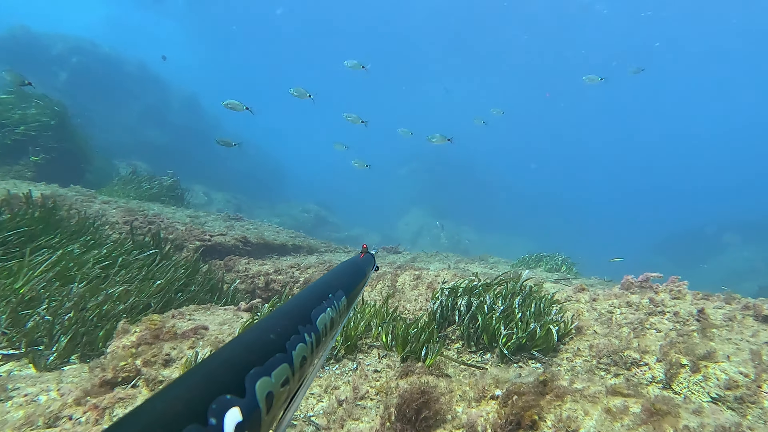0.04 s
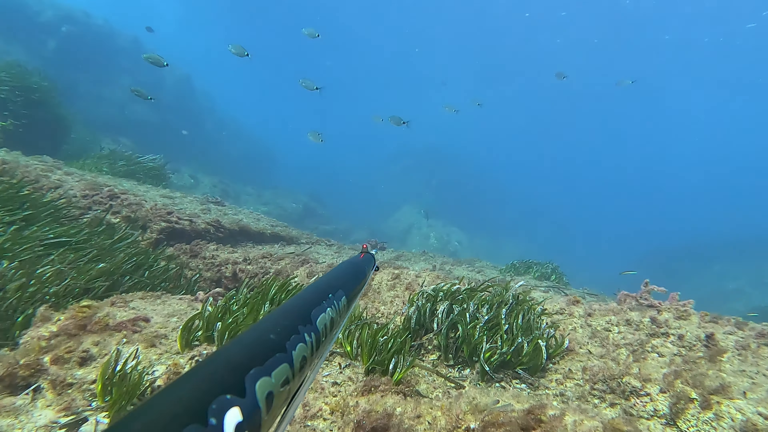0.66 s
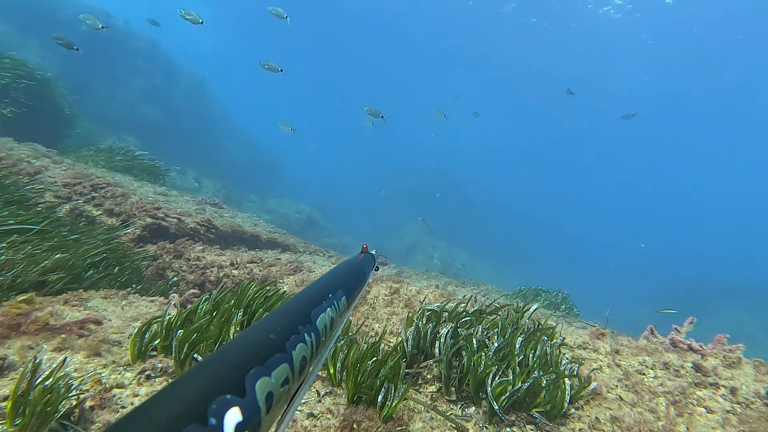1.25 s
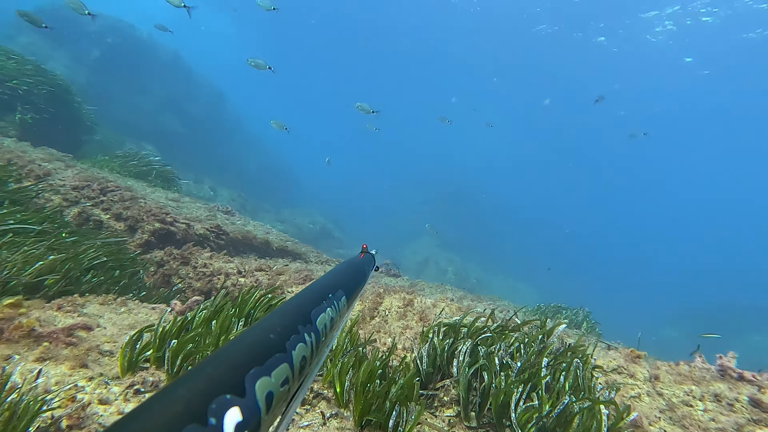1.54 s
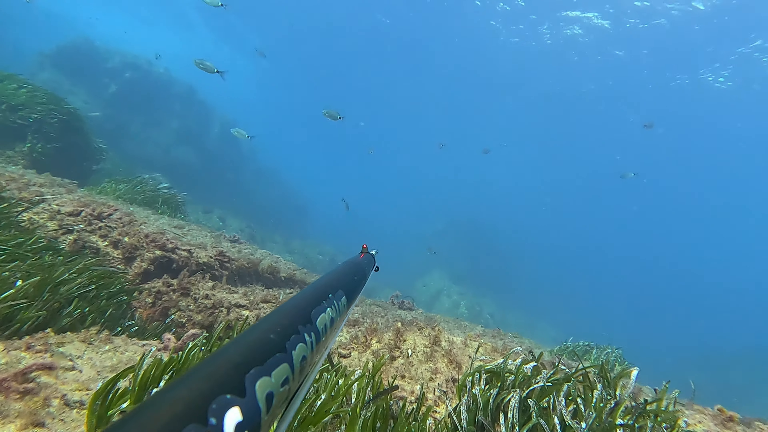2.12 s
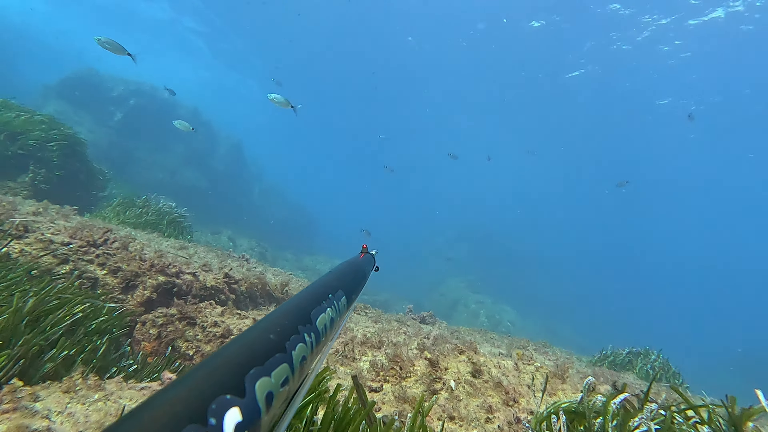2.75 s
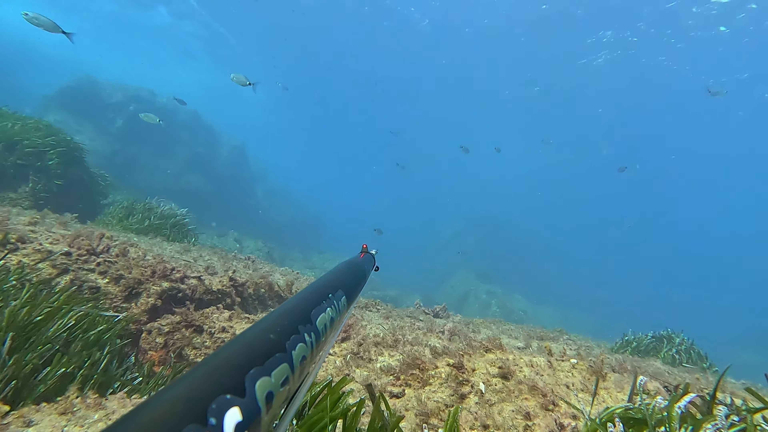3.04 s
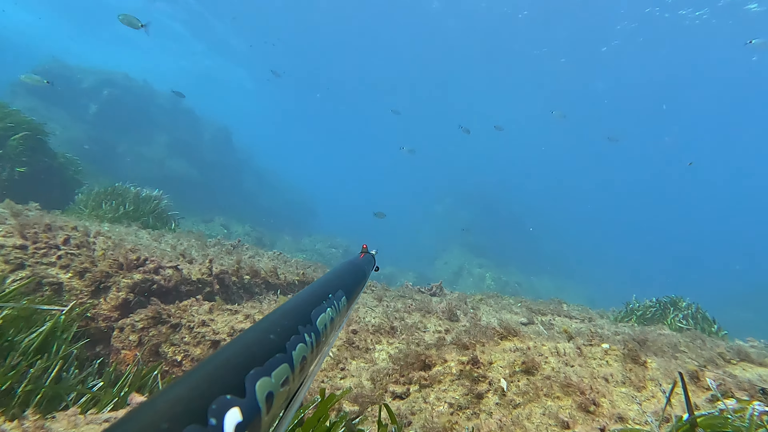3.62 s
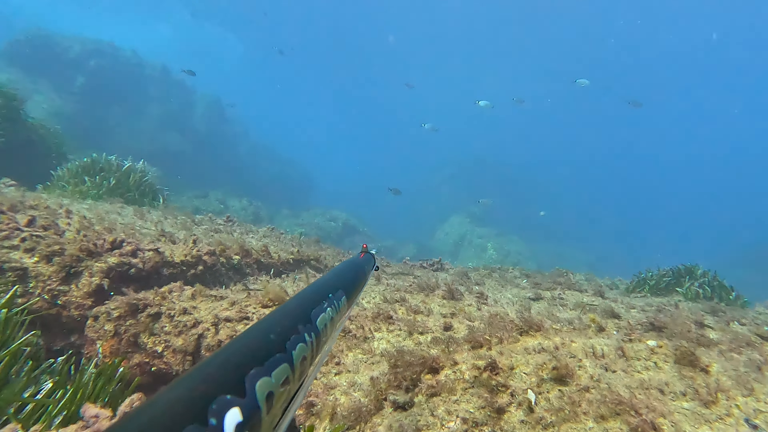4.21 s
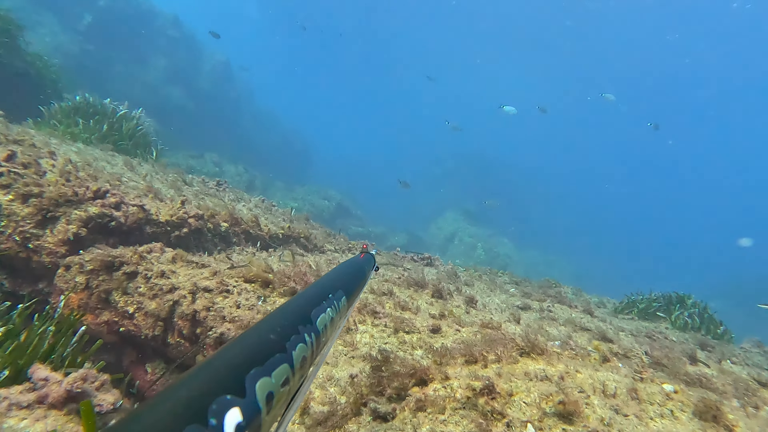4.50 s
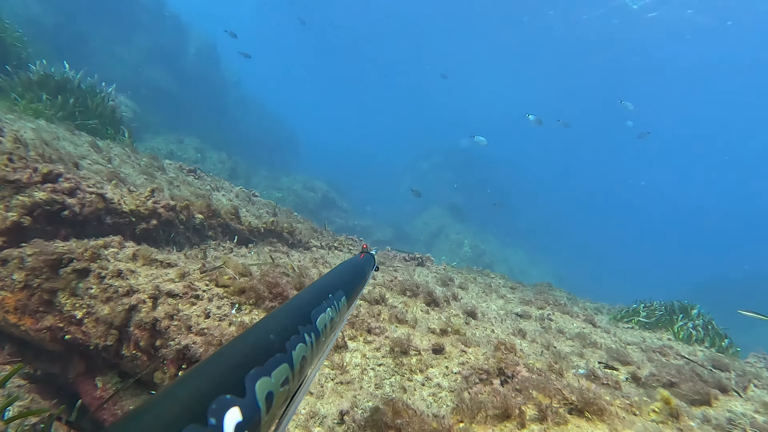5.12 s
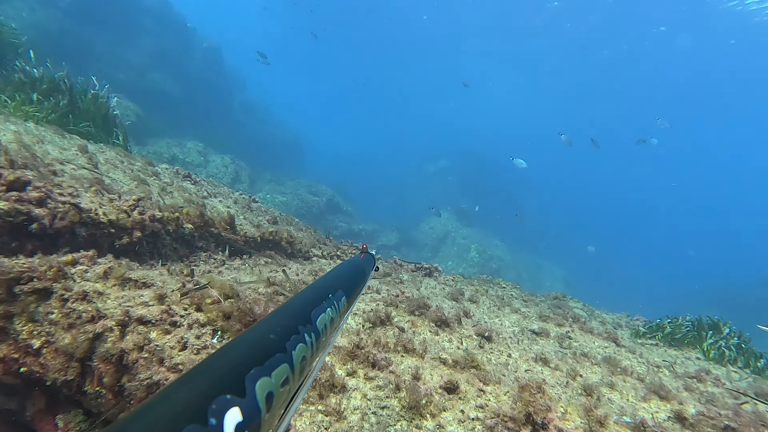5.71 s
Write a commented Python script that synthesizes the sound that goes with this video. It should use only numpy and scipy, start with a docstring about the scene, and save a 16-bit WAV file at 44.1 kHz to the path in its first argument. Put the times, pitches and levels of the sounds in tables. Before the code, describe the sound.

A camera in a waterproof housing glides through the sea on a speargun, picking up the constant, irregular crackle of shrimp over a deep water rumble. Faint taps and a soft slide of gear come here and there. The water surges and gurgles around the middle, then surges again as the sharpest click sounds. One dull knock follows, with a tap and, near the end, a brief scrape.

```python
"""Speargun camera over a reef

A housed camera on a speargun glides over a rocky seabed. Snapping shrimp crackle near and far:
claw bubbles collapse, scatter off the rocks and ring the housing wall. Moving water rocks the
housing with a low rumble, a few surges and gurgles. The gear slides softly twice, gives one
dull knock, then a tap, and later a short rub; lighter taps fall here and there."""
import sys
import numpy as np
from scipy import signal
from scipy.fft import rfft, irfft, next_fast_len
from scipy.io import wavfile
from scipy.ndimage import uniform_filter1d

SR = 44100
rng = np.random.default_rng(int(sys.argv[2]) if len(sys.argv) > 2 else 0)


def log_audio(samples):
    """Write samples as a 16-bit WAV file to the path given in sys.argv[1]."""
    # one column per channel
    frames = np.atleast_2d(samples).T
    # limit to full scale, then quantise
    limited = np.clip(frames, -1, 1)
    pcm = np.round(limited * 32767).astype(np.int16)
    wavfile.write(sys.argv[1], SR, pcm)


N = 262395
TIME = np.arange(N) / SR

# Surges as the gun swings. Each row: crest in seconds, sway in dB, rumble in dB, rocking in Hz.
SURGES = [(1.77, -42.5, -48, 17), (2.359, -33, -49.5, 17), (2.844, -22.5, -43, 19.3),
          (4.192, -20.5, -46, 17.2), (4.588, -27.5, -41, 18.5)]


def near_shrimp(rise_s=0.001):
    """Each collapsing claw bubble arrives by many paths and briefly rings the housing wall."""
    # Each row: time in seconds, level in dB, body and top bands in dB re level, optional own ring in Hz.
    snaps = [(0.039, -56.5, -12, -14), (0.052, -49.5, -13, -30, 4590), (0.118, -65.5, 3, -4),
             (0.1315, -53, -5, -13), (0.1676, -61.5, 2, -10), (0.179, -57.5, -6, -15),
             (0.228, -62, -8, -17), (0.245, -65, -8, -10), (0.2943, -59.5, -2.5, -29),
             (0.385, -63, -6, -20), (0.442, -65, 0, -5), (0.468, -66, -8, -8), (0.593, -69, -3, -5),
             (0.6625, -68, -2, -20), (0.702, -57, -1, -14), (0.7546, -53, -4, -17, 5180),
             (0.7588, -54.5, 2, -25, 1450), (0.8557, -64, -8, -6), (0.864, -59, -4, -9),
             (0.9986, -63, -17, -11), (1.038, -56, -2.5, -16), (1.0936, -47.5, -4, -16.5, 3930),
             (1.109, -60, -2, -18), (1.1554, -57.5, 1, -12), (1.2664, -49.5, -9, -9, 5510),
             (1.348, -64.5, -8, -3), (1.3754, -62.5, -16, -12), (1.455, -63, -3, -19),
             (1.5682, -68, -1, -3), (1.6182, -61, -4, -6), (1.629, -59.5, -8, -17), (1.669, -58, -8, -18),
             (1.677, -55.5, -4, -23), (1.7729, -62.5, 7.5, -31), (1.822, -65.5, -1, -7),
             (1.894, -66, -7, -5), (1.967, -60.5, -3.5, -6), (2.091, -64.5, -10, -4), (2.207, -65, 4, 4.5),
             (2.289, -63, -8, -23), (2.339, -67, -8, -12), (2.387, -58, -6, -30),
             (2.582, -53, -8, -12, 5440), (2.691, -69, -7, -1), (2.7233, -50, -9, -18, 5420),
             (2.754, -64.5, -5, 0), (2.81, -66, -11, -8), (2.8362, -65, 6, -19),
             (2.868, -54.5, 4.5, -18, 2760), (3.005, -60, -4, -13), (3.029, -72, -15, -23),
             (3.0784, -54.5, -2, -12), (3.1155, -51.5, -13, -15, 5370), (3.1683, -58, -14, -11),
             (3.187, -64.5, -10, -8), (3.209, -66, -10, -12), (3.2445, -53.5, -2.5, -14, 4540),
             (3.283, -62.5, -6, -8), (3.317, -64, -3, -18), (3.38, -60, -11, -12),
             (3.459, -44, -5, -14.5, 5450), (3.573, -66, -8, -12), (3.6614, -43, -14.5, -21.5, 3980),
             (3.7195, -66, -2, -22), (3.7471, -55, 1, -16), (3.7818, -60.5, 3, -7), (3.8547, -61.5, 0, -10),
             (3.916, -66, -8, -12), (3.9574, -61.5, -9, -6), (3.969, -64, -3, -4), (4.018, -65, -8, -12),
             (4.048, -57.5, 0, -24), (4.1125, -68, 0, -16), (4.2163, -35.5, -7, -18.5, 5500),
             (4.3182, -63, -19, -10), (4.329, -60.5, 2.5, -10), (4.357, -58, -1, -30),
             (4.4297, -56, -4.5, -15), (4.617, -65, -6, 0), (4.627, -54, -10, -11), (4.6703, -69, 5.5, -26),
             (4.722, -56.5, 5, -13), (4.925, -66, -8, -12), (5.0736, -58.5, -3, -24), (5.091, -64, -5, -26),
             (5.237, -59.5, -19, -19), (5.2623, -55, -11, -21), (5.3756, -69, -13, -9),
             (5.4265, -66, -9, -10), (5.482, -66, -8, -10), (5.494, -51.5, -2.5, -22, 4370),
             (5.509, -57, -0.5, -19), (5.55, -72, -3, 1), (5.6277, -64, -6, -8), (5.702, -56.5, -2, -22),
             (5.8324, -51, 2.5, -17, 4290), (5.887, -66, 0, -3), (5.8956, -73, 7, -21)]
    # A snap through the wall. Each row: frequency in Hz, relative density in dB.
    snap_colour = [(600, -22), (1100, -16), (1450, -3.5), (2000, -1.5), (2450, -7), (3050, 1), (3500, -5.5),
                   (4000, 2.5), (4800, 2.5), (5450, 6.5), (6000, 2), (9000, -16), (10500, -23.5),
                   (15000, -32)]
    paths = rms_one(coloured(clicks(per_s=4500, spread_db=-2.0, limit=8.1), snap_colour))
    clumps = rms_one(from_db(wander(0.002)))   # scatter returns rock by rock, 1 dB rms
    bands = [([600, 3300], [body_db for _, _, body_db, *_ in snaps]),
             ([3300, 7200], [-1.0] * len(snaps)),
             ([7800, 15500], [top_db for _, _, _, top_db, *_ in snaps])]
    out = 0
    for edges_hz, offsets_db in bands:
        band = signal.sosfilt(signal.butter(4, edges_hz, "band", fs=SR, output="sos"), paths)
        power = sum(from_db(offset_db) ** 2 * snap_power(start_s, db, rise_s, clumps)
                    for (start_s, db, *_), offset_db in zip(snaps, offsets_db))
        out = out + np.sqrt(power) * steadied(band, 0.0031)
    return out + wall_rings(snaps, rise_s)


def snap_power(start_s, level_db, rise_s, clumps, hold_s=0.00048, fall_s=0.001, scatter_s=0.0102):
    """Power envelope of a snap: a tight cluster of direct paths, then scatter from the rocks."""
    power = np.zeros(N)
    span = slice(max(int((start_s - .01) * SR), 0), int((start_s + .2) * SR))
    age_s = TIME[span] - start_s
    late_s = np.maximum(age_s - hold_s, 0)
    onset = np.exp(np.minimum(age_s, 0) / rise_s)
    scatter_db = -10 - 0.2343 * (level_db + 45.5)   # weaker snaps are farther off: more scatter
    scatter = (from_db(scatter_db) * clumps[span]) ** 2 * np.exp(-late_s / scatter_s)
    power[span] = from_db(level_db) ** 2 * onset * (np.exp(-late_s / fall_s) + scatter)
    return power


def wall_rings(snaps, rise_s, ring_s=0.0011, spread_db=3.0, detune=0.025, own_db=-5, own_s=0.0013):
    """Each snap strikes the wall from another side, so its modes vary in level and pitch."""
    # Each row: frequency in Hz, level in dB re the snap, share of the snap's body dB that it follows.
    wall_modes = [(2990, -11.5, 0.4), (4210, -11.5, 1), (5446, -8, 0)]
    out = np.zeros(N)
    draws = rng.uniform(-1, 1, (len(snaps), len(wall_modes), 2))
    for (start_s, db, body_db, _, *own_hz), chances in zip(snaps, draws):
        span = slice(int((start_s - .01) * SR), int((start_s + .05) * SR))
        age_s = TIME[span] - start_s
        modes = [(hz * (1 + detune * higher), mode_db + follows * body_db + spread_db * louder, ring_s)
                 for (hz, mode_db, follows), (louder, higher) in zip(wall_modes, chances)]
        for hz in own_hz:   # a hard snap drives one mode above the rest
            nearest = np.argmin([abs(mode[0] - hz) for mode in modes])
            modes[nearest] = (hz, own_db, own_s)
        for hz, mode_db, decay_s in modes:
            power = np.exp(np.minimum(age_s, 0) / rise_s - np.maximum(age_s, 0) / decay_s)
            out[span] += from_db(db + mode_db) * np.sqrt(2 * power) * np.sin(2 * np.pi * hz * age_s)
    return out


def surge(crest_s, rise_db_per_s=397, fall_db_per_s=82):
    """Envelope of a surge: builds fast, ebbs slowly."""
    rise_db = np.clip(rise_db_per_s * (crest_s - TIME), -200, 200)
    fall_db = np.clip(fall_db_per_s * (TIME - crest_s), -200, 200)
    return 1 / (from_db(rise_db) + from_db(fall_db))


def rocking():
    """Each surge rocks the gun for a few smooth, very low cycles."""
    return sum(np.sqrt(2) * from_db(db) * surge(crest_s) * np.cos(2 * np.pi * hz * (TIME - crest_s))
               for crest_s, db, _, hz in SURGES)


def water():
    """Flow round the housing: slow pressure sway, and a rumble that swells in each surge."""
    # Each row: time in seconds, sway in dB, rumble between surges in dB.
    flow = [(0.1, -38.5, -54), (0.55, -40.5, -58), (1.15, -41, -55.5), (1.75, -43, -54.5), (2.6, -43, -55),
            (3.07, -45, -57), (3.35, -50, -55.5), (3.6, -37, -51.5), (4.3, -38, -50.5), (4.72, -41.5, -58),
            (5.1, -41.5, -59), (5.35, -43, -59), (5.9, -36.5, -53)]
    # Sway and rumble spectra. Each row: frequency in Hz, relative density in dB.
    sway_colour = [(10, -3), (16, -1), (21, -5.5), (26, -17), (36, -24), (60, -74)]
    rumble_colour = [(26, -2.5), (34, 3.5), (45, 7.5), (58, -11.5), (85, -12.5), (130, -26.5), (200, -50.5)]
    sway_db, drift_db = in_time(flow)
    surge_power = sum(2 * (from_db(db) * surge(crest_s)) ** 2 for crest_s, _, db, _ in SURGES)
    sway = from_db(sway_db) * steadied(noise(sway_colour), 0.19)
    rumble = np.sqrt(from_db(drift_db) ** 2 + surge_power) * steadied(noise(rumble_colour), 0.09)
    return sway + rumble


def knock():
    """A padded blow rings the gun's body; water damps the high modes at once."""
    # Each row: time in seconds, impulse in dB, contact time in seconds.
    blows = [(4.566, 0.5, 0.00094)]
    # Each row: frequency in Hz, gain in dB, t60 in seconds, sign of the first swing.
    body_modes = [(21.7, -42, 0.7, 1), (91, -34, 0.5, -1), (216, -20, 0.026, 1), (267, -17, 0.029, -1),
                  (355, -26, 0.032, -1), (402, -34.5, 0.08, 1), (555, -21.5, 0.0275, 1),
                  (700, -28, 0.014, -1), (1010, -39, 0.05, -1)]
    force = 0
    for time_s, db, contact_s in blows:
        pulse = np.exp(-np.minimum((2 * (TIME - time_s) / contact_s) ** 2, 40))
        area = contact_s * SR * np.sqrt(np.pi) / 2
        force = force + from_db(db) * pulse / area
    return sum(sign * from_db(db) * ring(force, hz, t60_s) for hz, db, t60_s, sign in body_modes)


def taps(chatter_db=-6, chatter_s=0.02, low_below_hz=1150):
    """Light taps ping the housing near 1.4 kHz, a few also thud lower; a faint chatter follows each."""
    # Each row: start in seconds, level in dB, extra dB for the modes under low_below_hz.
    contacts = [(0.116, -65.5, -2), (0.127, -68, -2), (0.637, -62, -26), (0.681, -63, -28),
                (3.126, -59.5, -8), (4.72, -57.5, 12), (4.733, -59, -20), (4.796, -60.5, -18),
                (5.574, -65.5, 11)]
    # Each row: frequency in Hz, gain in dB, t60 in seconds.
    housing_modes = [(303, -2.5, 0.023), (440, 2, 0.017), (580, 2, 0.028), (731, -3.5, 0.06),
                     (1040, 7.5, 0.015), (1300, 1.5, 0.042), (1435, 9, 0.034), (1760, 0.5, 0.081),
                     (1620, 5, 0.02)]
    age_s, out = TIME[:SR // 10], 0
    chatter = from_db(chatter_db) * np.exp(-age_s / chatter_s) / np.sqrt(chatter_s * SR / 2)
    for k, (hz, mode_db, t60_s) in enumerate(housing_modes):
        force = np.zeros(N)
        for start_s, db, low_db in contacts:
            contact = chatter * rng.standard_normal(len(age_s))
            contact[0] += 1
            first = int(start_s * SR)
            force[first:first + len(age_s)] += from_db(db + low_db * (hz < low_below_hz)) * contact
        out = out + (-1) ** k * from_db(mode_db) * ring(force, hz, t60_s)
    return out


def rubs(gain_db=0.5, stutter_db=1.5, attack_s=0.0022, release_s=0.013, ring_db=-15):
    """Gear slides on gear in tiny slips that catch unevenly and ring the housing."""
    # Each row: start and length in seconds, level in dB, easing in dB per second, hiss in dB re level.
    strokes = [(2.75, 0.075, -68, 16, -4), (4.023, 0.15, -65, -6, 0), (5.569, 0.18, -50.5, 58, -13)]
    # Scrape and hiss through the housing. Each row: frequency in Hz, relative density in dB.
    scrape_colour = [(100, -9), (200, 11), (250, 0), (315, 11), (430, 3), (690, 5.5), (800, -2), (940, 1),
                     (1150, 2.5), (1650, -1.5), (2000, -7), (2500, -27), (5000, -32)]
    hiss_colour = [(900, -9), (1300, -1), (1700, 1), (2000, -4), (2400, -17)]
    pressure = hiss_gain = 0
    for start_s, length_s, db, easing_db_per_s, hiss_db in strokes:
        age_s = TIME - start_s
        contact = np.exp(np.minimum(age_s, 0) / attack_s - np.maximum(age_s - length_s, 0) / release_s)
        stroke = contact * from_db(db - easing_db_per_s * np.clip(age_s, 0, length_s))
        pressure = pressure + stroke
        hiss_gain = hiss_gain + from_db(hiss_db) * stroke
    catching = from_db(gain_db + stutter_db * wander(0.016))
    slips = clicks(per_s=820, spread_db=2.0, limit=2.1)
    ringing = from_db(ring_db) * rms_one(ring(slips, hz=717, t60_s=0.04))
    scrape = rms_one(rms_one(coloured(slips, scrape_colour)) + ringing)
    hiss = rms_one(coloured(slips, hiss_colour))
    return catching * (pressure * scrape + hiss_gain * hiss)


def gurgles(stir_db=-10.5):
    """Short low sliding tones: gurgles, plus the knock's burbling tail and the tap's low thud."""
    # Each row: peak in seconds, level in dB, pitch in Hz, swell or fade in seconds, slide as share per s.
    tones = [(0.123, -56, 127, .016, 0), (0.128, -70, 385, .017, 0), (0.259, -68, 280, .017, -4),
             (1.04, -69, 190, .02, 0), (1.45, -68.5, 430, .016, 1), (1.775, -65, 150, .02, 4),
             (2.055, -65, 211, .017, -5), (2.239, -57.5, 100, .017, 3), (2.79, -58, 188, .019, 5),
             (2.849, -49, 138, .017, -3), (3.2, -58.5, 280, .008, -6), (3.21, -45.5, 122, .013, -3),
             (3.224, -58, 200, .016, 3), (3.476, -60, 315, .012, -9), (3.478, -48.5, 112, .012, -6),
             (3.51, -64, 215, .022, 4), (3.573, -56, 115, .016, -3), (3.59, -66, 220, .02, -3),
             (3.616, -72, 550, .013, -8), (3.826, -64, 217, .017, 4), (4.103, -61, 205, .03, 0),
             (4.582, -44, 155, .011, -4), (4.6, -51, 210, .017, 3), (4.612, -50, 115, .016, -3),
             (4.665, -64, 320, .012, -5), (4.668, -62, 220, .016, 0), (4.685, -56, 112, .016, -3),
             (4.72, -52, 135, .014, 0), (4.799, -59, 290, .007, -4), (5.65, -56, 312, .015, -3),
             (5.71, -60, 120, .025, 0)]
    # Stirred water under each tone. Each row: frequency in Hz, relative density in dB.
    stir_colour = [(80, -3), (140, 7), (300, -5.5), (380, -9), (500, -21)]
    stir = from_db(stir_db) * steadied(noise(stir_colour), 0.0246)
    out = np.zeros(N)
    for peak_s, db, hz, swell_s, slide_per_s in tones:
        age_s = TIME - peak_s
        phase = 2 * np.pi * hz * age_s * (1 + .5 * slide_per_s * age_s) + rng.uniform(0, 2 * np.pi)
        swell = np.exp(-np.minimum((age_s / swell_s) ** 2, 20))
        out += from_db(db) * swell * (np.sqrt(2) * np.sin(phase) + stir)
    return out


def far_shrimp(mean_db=-68, swing_share=0.99):
    """Thousands of snaps a second, dulled by distance into a wash."""
    # Crackle activity. Each row: time in seconds, relative level in dB.
    activity = [(0.0, -68.5), (0.33, -70.5), (1.08, -67), (1.44, -69), (4.17, -68.5), (5.22, -71),
                (5.95, -67.5)]
    # Each row: frequency in Hz, relative density in dB.
    far_colour = [(350, -11), (800, -14.5), (1130, -9.5), (1380, 1), (1600, 2), (1900, -3.5), (2450, -12.5),
                  (3050, -12), (3500, -16), (4800, -17.5), (5450, -13), (6100, -17), (7400, -18),
                  (9200, -31), (10800, -47), (12200, -42), (15000, -50)]
    activity_db, = in_time(activity)
    level_db = mean_db + swing_share * (activity_db - activity_db.mean())
    snaps = clicks(per_s=4000, spread_db=0.5, limit=3.9)
    return from_db(level_db) * rms_one(coloured(snaps, far_colour))


def eddies(patchy_db=3.3):
    """The housing's edges shed small eddies in patches."""
    # Each row: time in seconds, level in dB.
    shedding = [(0.1, -68.5), (0.5, -74.5), (1.25, -71.5), (1.9, -70.5), (2.5, -70.5), (2.8, -68.5),
                (3.1, -73.5), (3.7, -70.5), (4.3, -71.5), (5.1, -72), (5.9, -74)]
    # Each row: frequency in Hz, relative density in dB.
    eddy_colour = [(50, -5), (90, -4.5), (140, 3.5), (200, -0.5), (300, -3.5), (400, -13.5), (520, -8.5),
                   (750, -17.5)]
    level_db, = in_time(shedding)
    return from_db(level_db + patchy_db * wander(0.06)) * noise(eddy_colour)


def reef_shrimp(level_db=-74.3, rise_s=0.001, fall_s=0.00079, scatter_db=-23, scatter_s=0.034):
    """Eight colonies farther off, each with its own echo paths and brightness."""
    # Each row: frequency in Hz, relative density in dB.
    reef_colour = [(500, -22), (1100, -3), (1500, -9), (2450, -8), (3050, 6), (3450, 5), (3950, 2.5),
                   (4700, -1), (5450, 7), (7400, -14), (9200, -6.5), (10800, -20), (12200, -19),
                   (15500, -45.5)]
    age_s, out = TIME[:SR // 8], 0
    onset = 1 - np.exp(-(age_s / rise_s) ** 2)
    decay = np.exp(-age_s / fall_s) + from_db(scatter_db) * np.exp(-age_s / scatter_s)
    for tilt_db_per_octave in np.linspace(-5, 5, 8):
        paths = rng.standard_normal(len(age_s)) * onset * decay
        snaps = signal.fftconvolve(clicks(per_s=50, spread_db=2.0, limit=2.74), paths)[:N]
        tilted = [(hz, db + tilt_db_per_octave * np.log2(hz / SR)) for hz, db in reef_colour]
        out = out + coloured(snaps, tilted)
    return from_db(level_db) * rms_one(out)


def tiny_shrimp(level_db=-79.5, t60_s=0.0056, highpass_hz=2500):
    """Dry ticks just below the camera, each ringing the wall in its own mix of pitches."""
    # Each row: frequency in Hz, relative level in dB.
    tick_modes = [(3100, -5), (4000, 1), (4900, 0.5), (5500, 1), (6400, 4.5), (7400, -7), (8900, -4.5),
                  (10300, -13), (12200, -15)]
    ticks = clicks(per_s=110, spread_db=5.0, limit=2.66)
    hits, out = np.flatnonzero(ticks), 0
    for (hz, db), shares in zip(tick_modes, rng.standard_normal((len(hits), len(tick_modes))).T):
        force = np.zeros(N)
        force[hits] = ticks[hits] * shares
        out = out + from_db(db) * ring(force, hz, t60_s)
    highpass = signal.butter(2, highpass_hz, "high", fs=SR, output="sos")
    return from_db(level_db) * rms_one(signal.sosfilt(highpass, out))


def from_db(db):
    """Decibels to gain."""
    return 10 ** (np.asarray(db) / 20)


def rms_one(x):
    """Scale to unit power."""
    return x / np.sqrt(np.mean(x ** 2) + 1e-20)


def in_time(rows):
    """Each column of a timed curve, at every sample."""
    times_s, *columns = np.transpose(rows)
    return [np.interp(TIME, times_s, column) for column in columns]


def coloured(x, points):
    """Minimum-phase filter shaped by (Hz, dB) points; falls 24 dB/octave for two octaves outside them."""
    size = next_fast_len(N + SR // 2)
    size += size % 2
    octave = np.log2(np.maximum(np.arange(size // 2 + 1), 1) * SR / size)
    points_hz, points_db = np.transpose(points)
    knots = np.log2(points_hz)
    outside = np.abs(octave - np.clip(octave, knots[0], knots[-1]))
    gain_db = np.interp(octave, knots, points_db) - 24 * np.minimum(outside, 2)
    cepstrum = irfft(np.log(from_db(gain_db)))
    cepstrum[1:size // 2] *= 2
    cepstrum[size // 2 + 1:] = 0
    response = np.exp(rfft(cepstrum))
    return irfft(rfft(x, size) * response / np.sqrt(np.mean(np.abs(response) ** 2)))[:N]


def noise(points):
    """Coloured noise, unit power."""
    return rms_one(coloured(rng.standard_normal(N), points))


def wander(window_s):
    """Smoothed random drift, unit power."""
    return rms_one(uniform_filter1d(rng.standard_normal(N), int(window_s * SR)))


def steadied(x, window_s):
    """Level out the chance swells of a noise."""
    return x / np.sqrt(np.abs(uniform_filter1d(x ** 2, int(window_s * SR))) + 1e-6)


def clicks(per_s, spread_db, limit):
    """Random clicks; each level is spread_db times an exponential draw capped at limit."""
    sizes = from_db(spread_db * np.minimum(rng.exponential(1, N), limit)) * rng.choice([-1, 1], N)
    return sizes * (rng.random(N) < per_s / SR)


def ring(force, hz, t60_s):
    """One mode: a unit push starts a decaying sine of height 1."""
    radius, angle = from_db(-60 / (t60_s * SR)), 2 * np.pi * hz / SR
    return signal.lfilter([0, np.sin(angle)], [1, -2 * radius * np.cos(angle), radius ** 2], force + 1e-18)


def scene():
    """Shrimp, water and gear through one housing, mono."""
    shrimp = near_shrimp() + tiny_shrimp() + reef_shrimp() + far_shrimp()
    sea = water() + eddies() + rocking() + gurgles()
    return (shrimp + sea + knock() + taps() + rubs())[None, :]


def record(dry):
    """Steep low-pass."""
    cutoff_hz = 15750
    return signal.sosfilt(signal.ellip(10, .1, 80, cutoff_hz, fs=SR, output="sos"), dry)


dry = scene()
out = record(dry)
log_audio(out)
```